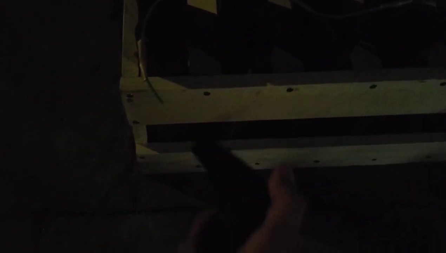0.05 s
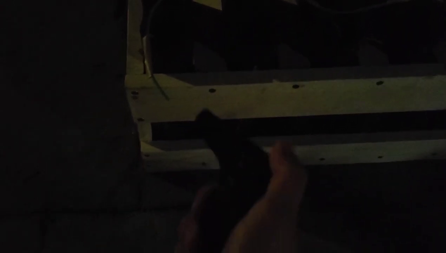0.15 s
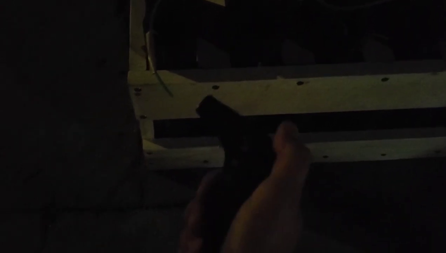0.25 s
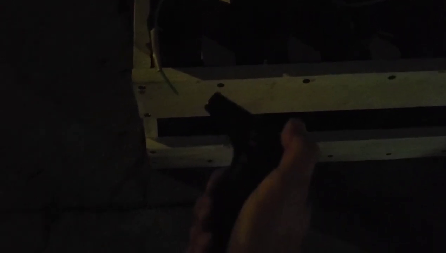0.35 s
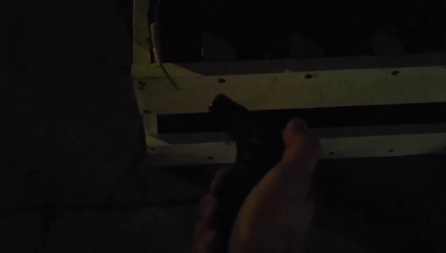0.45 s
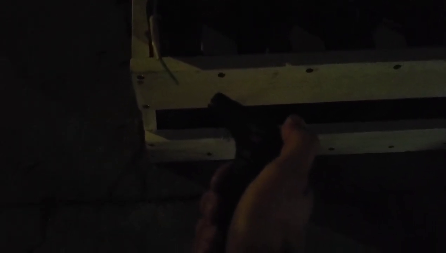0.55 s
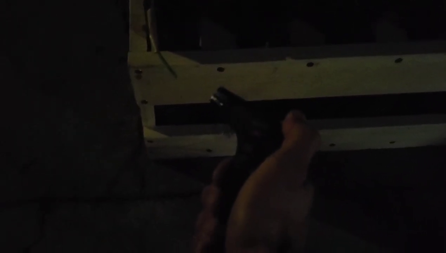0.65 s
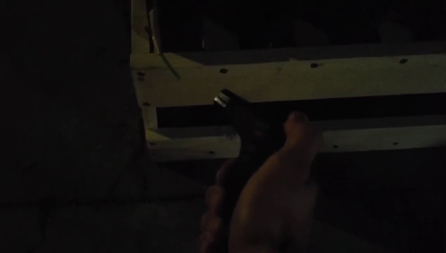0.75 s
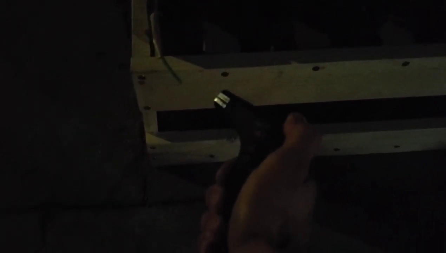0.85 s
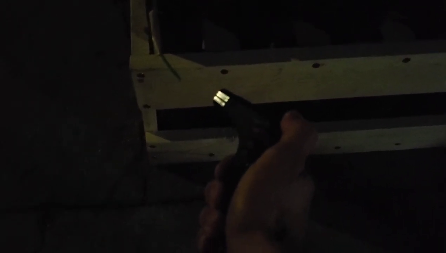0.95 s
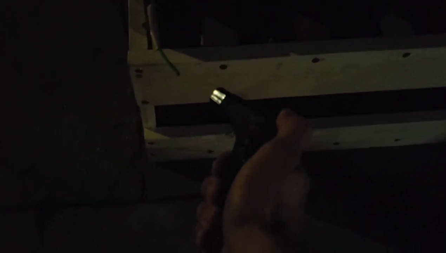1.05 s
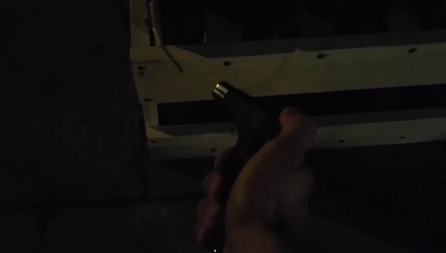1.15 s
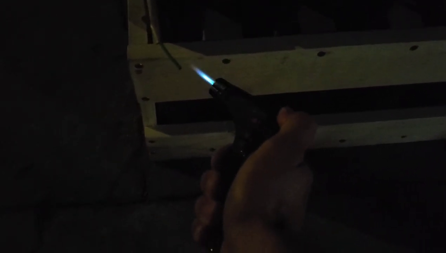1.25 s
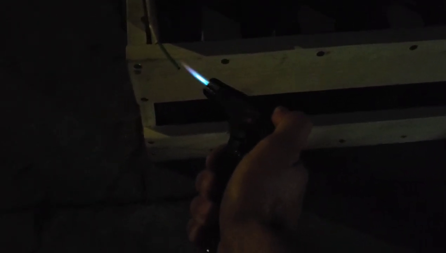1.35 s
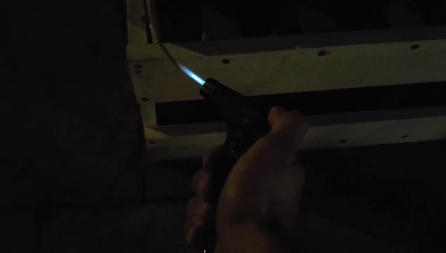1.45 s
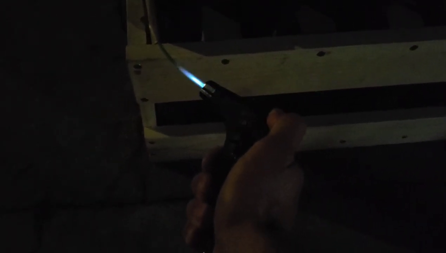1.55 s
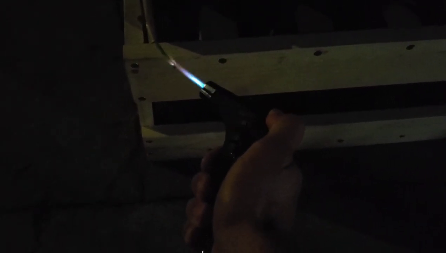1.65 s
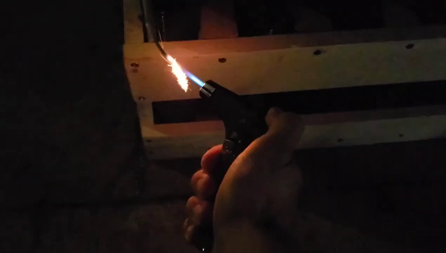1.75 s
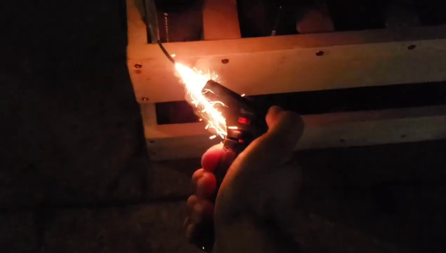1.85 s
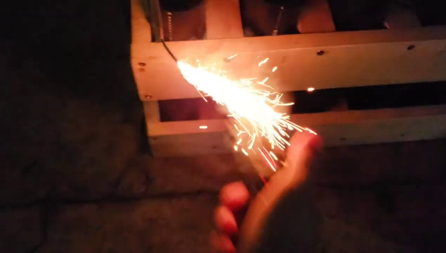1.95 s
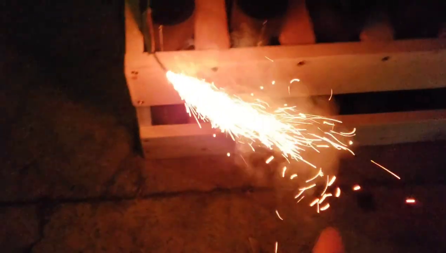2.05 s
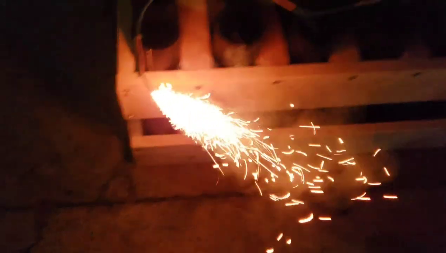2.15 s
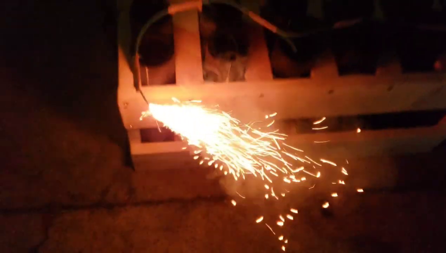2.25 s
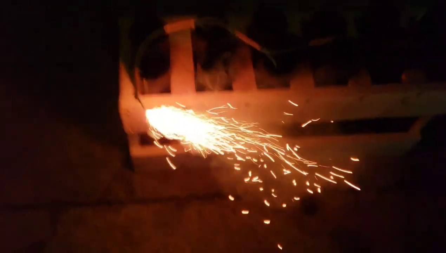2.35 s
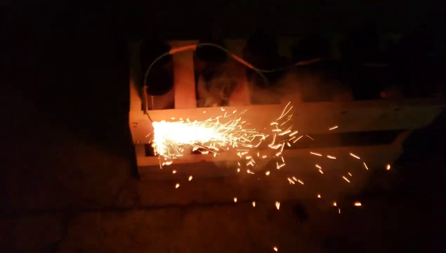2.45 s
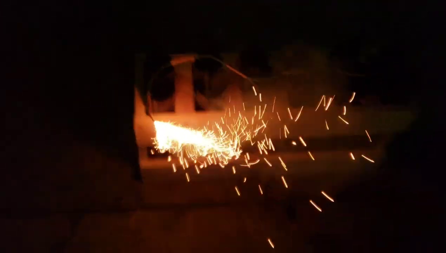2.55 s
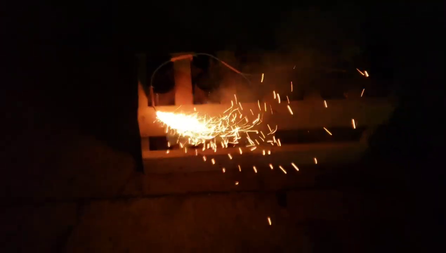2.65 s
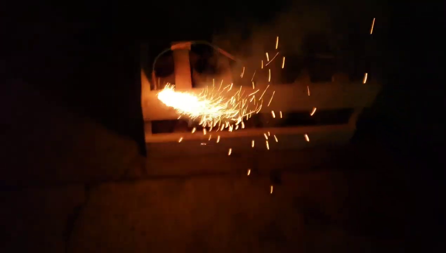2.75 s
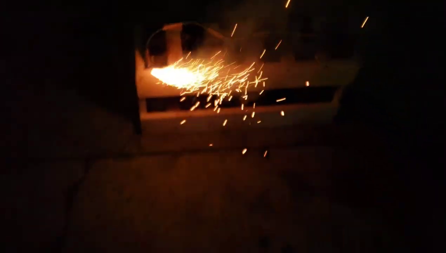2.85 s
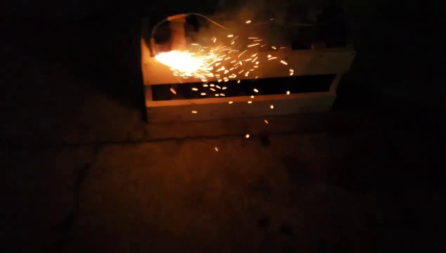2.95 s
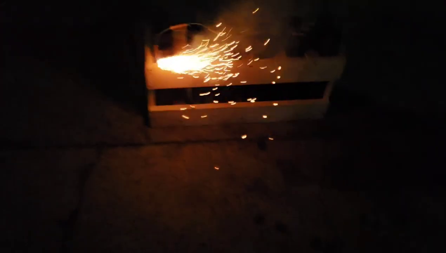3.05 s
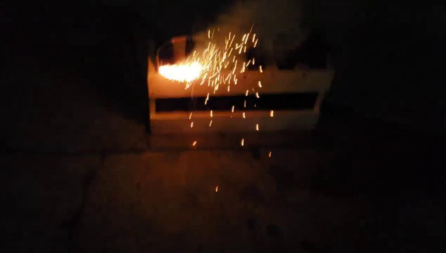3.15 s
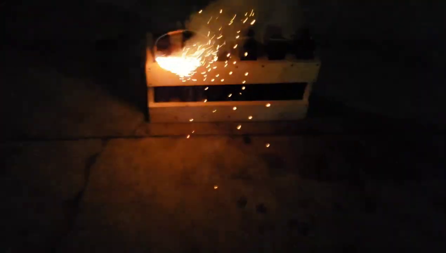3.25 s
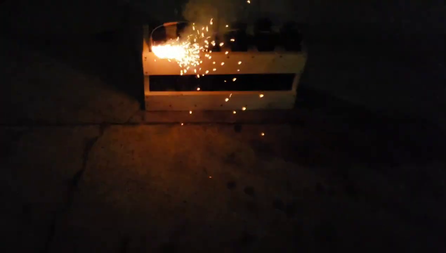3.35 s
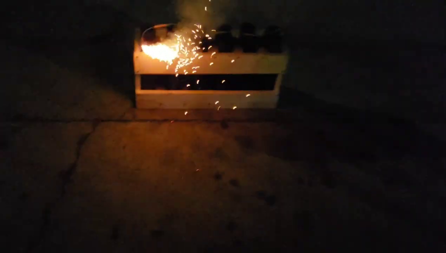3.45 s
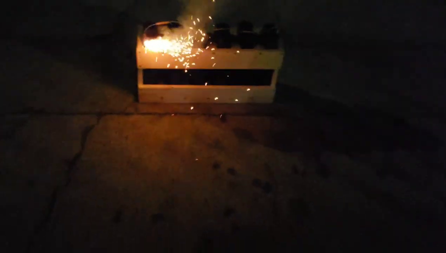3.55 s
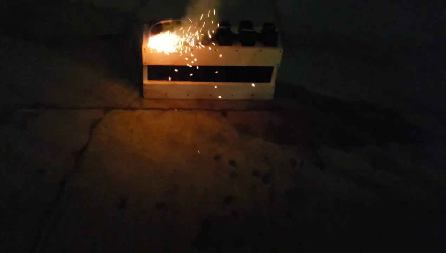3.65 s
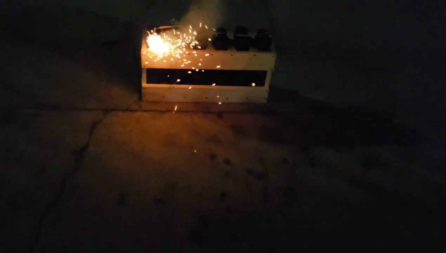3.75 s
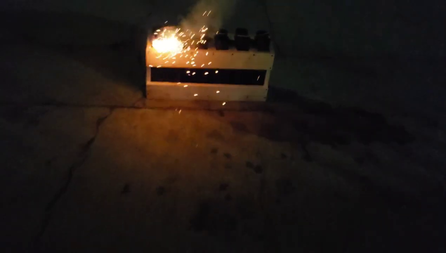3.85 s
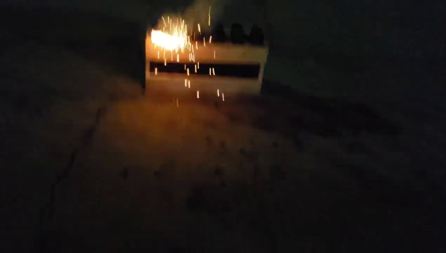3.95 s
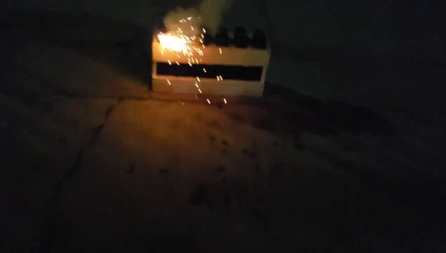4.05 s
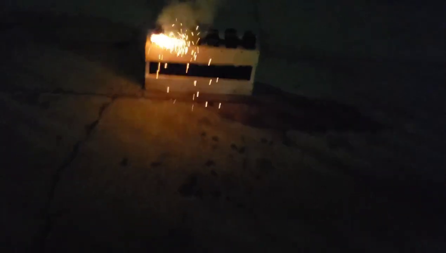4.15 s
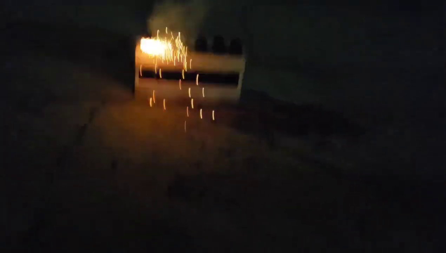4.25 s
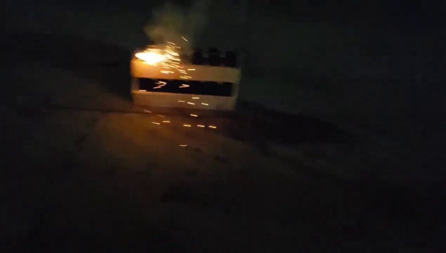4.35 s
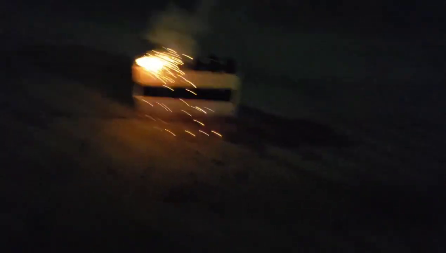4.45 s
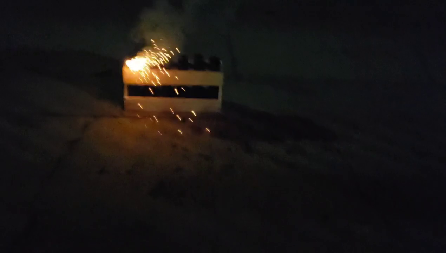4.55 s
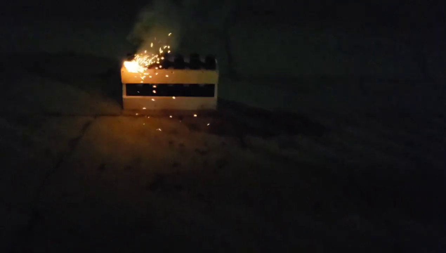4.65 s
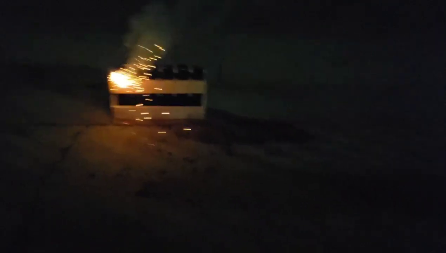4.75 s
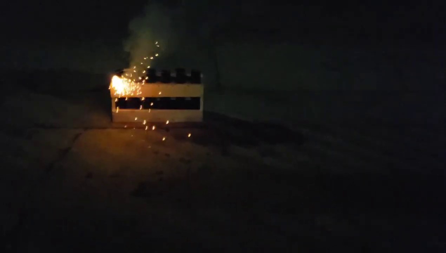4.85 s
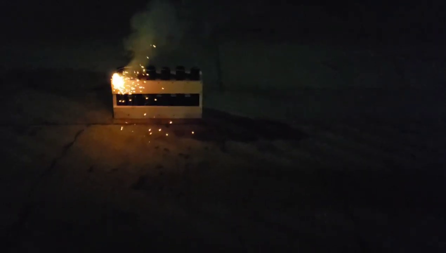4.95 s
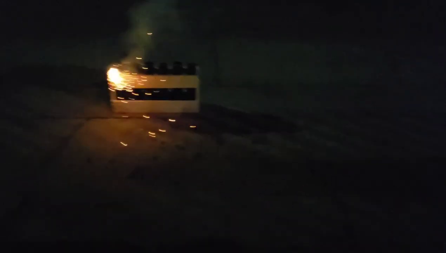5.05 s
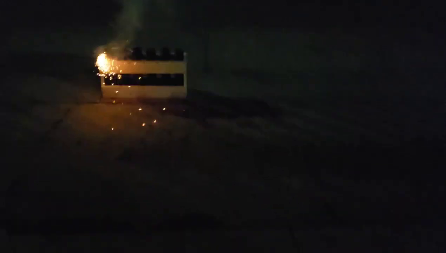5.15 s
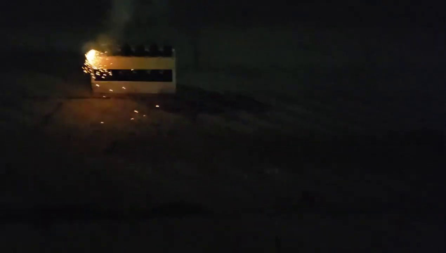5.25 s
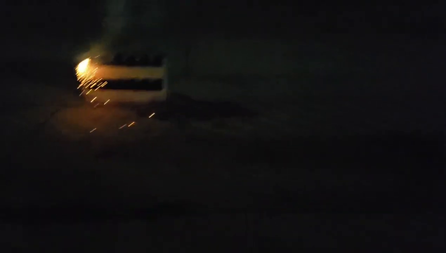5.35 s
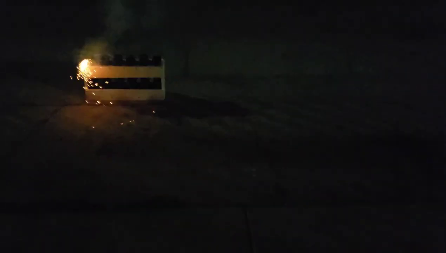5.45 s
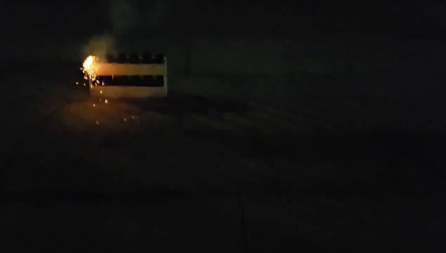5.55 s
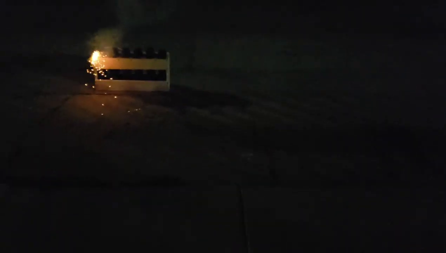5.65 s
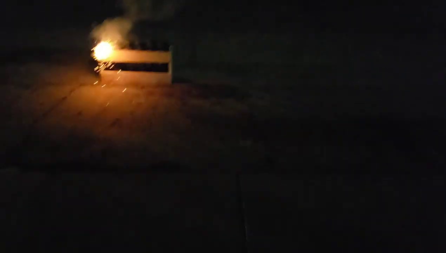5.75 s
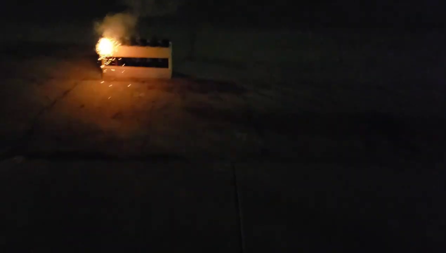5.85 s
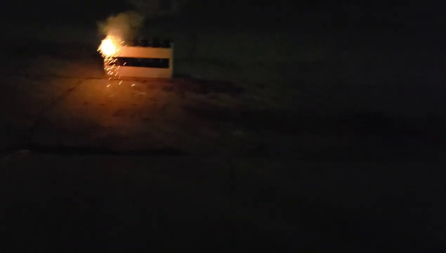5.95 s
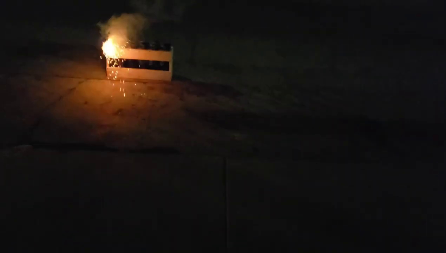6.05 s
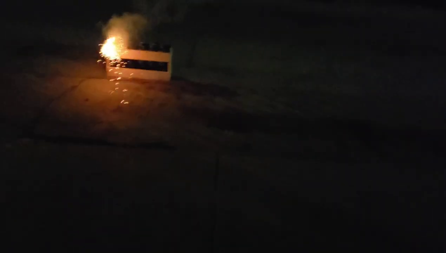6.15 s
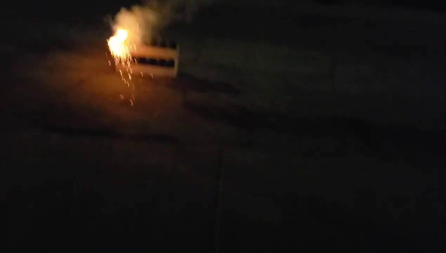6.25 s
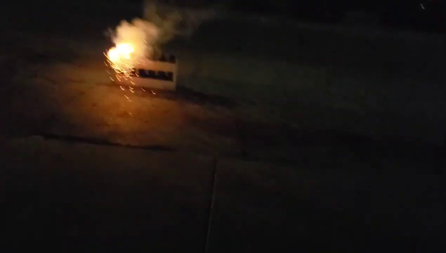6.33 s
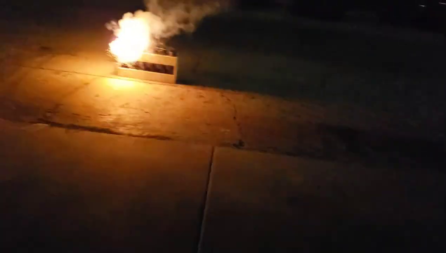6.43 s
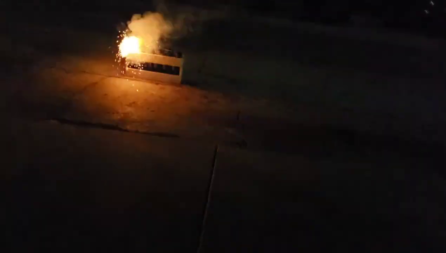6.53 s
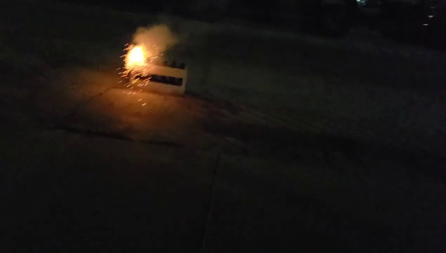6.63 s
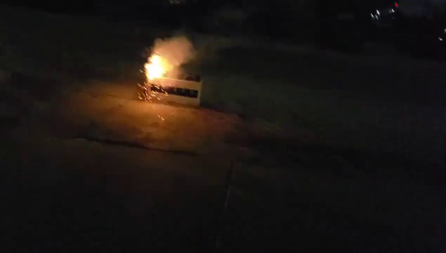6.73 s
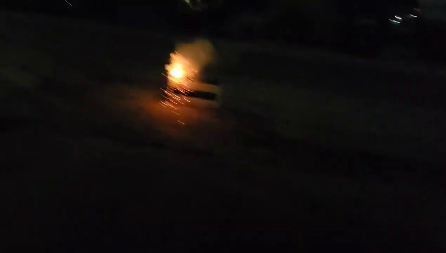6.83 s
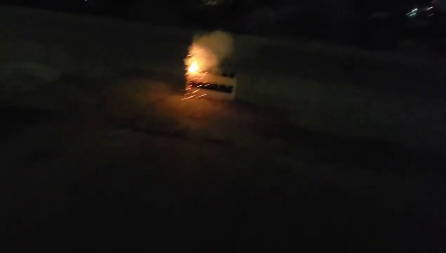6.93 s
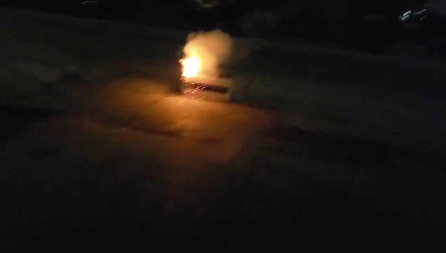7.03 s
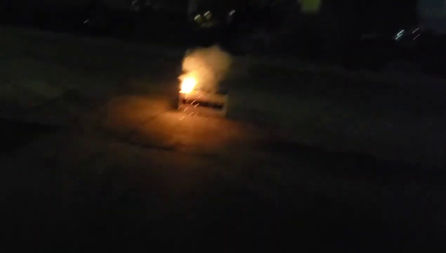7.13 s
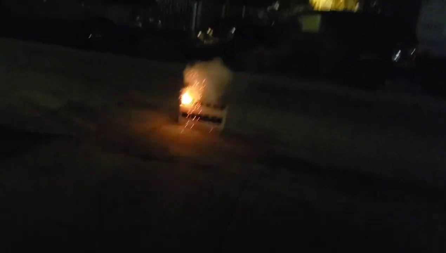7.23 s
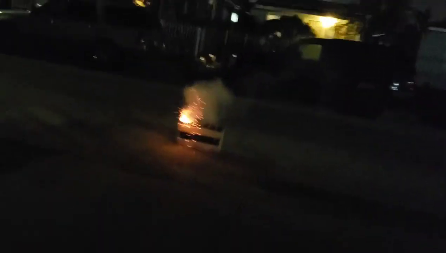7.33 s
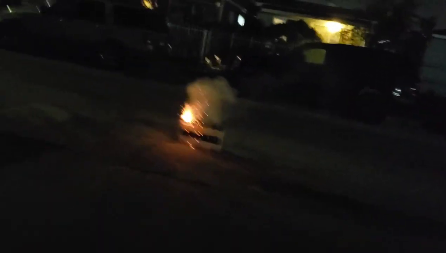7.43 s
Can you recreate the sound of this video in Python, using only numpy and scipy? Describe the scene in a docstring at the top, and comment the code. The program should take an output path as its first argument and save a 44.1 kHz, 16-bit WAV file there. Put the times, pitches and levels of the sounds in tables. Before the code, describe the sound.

Distant traffic makes a low outdoor rumble throughout, with a brief low hum swelling at about 1 second, alongside a faint finger rub. At 1.2 seconds a gas torch's igniter snaps sharply close to the microphone, and the jet burns with a soft hiss. At 1.8 seconds a firework fuse catches and fizzes brightly, sputtering with tiny sparks, strongest around 2.3 to 2.5 seconds. The hiss then eases and shifts in colour as the microphone backs away over concrete. Single sparks crack near 2 and 3.1 seconds. From 2.6 seconds an engine throbs low some way off, growing louder from about 4.6 seconds. From 5.5 seconds the fuse, now among the slats of a wooden crate, surges again with sharp crackles and a hollow rush that rises in pitch. Short spurts and pops cluster from 6.4 seconds until the end at about 7.5 seconds.

```python
"""Outdoors at night. Far traffic rumbles throughout; two low drones swell and fade. A finger brushes a gas
torch, gas hisses, the igniter snaps at 1.2 s and the jet burns. From 1.8 s a fuse on a wooden crate hisses and
spits sparks. The listener backs away: the echo off the concrete follows ever closer, its comb widens. From 2.6
s an engine throbs some way off. From 4.4 s the flame creeps in among the slats, and from 5.7 s a hollow rush
rises around a resonance climbing from 1.2 to 1.65 kHz."""
import sys
import numpy as np
from scipy import signal
from scipy.fft import rfft, irfft, next_fast_len
from scipy.io import wavfile
from scipy.ndimage import uniform_filter1d, map_coordinates

SR = 44100
rng = np.random.default_rng(int(sys.argv[2]) if len(sys.argv) > 2 else 0)


def master_out(mix):
    """Clip the mix to full scale and print it as 16-bit PCM to the path in sys.argv[1]."""
    frames = np.transpose(np.atleast_2d(mix))
    ceiling = np.clip(frames, -1, 1)
    pcm = np.round(ceiling * 32767).astype(np.int16)
    wavfile.write(sys.argv[1], SR, pcm)


N = 330309
TIME_S = np.arange(N) / SR

# far road: time_s, rumble_db, boom_db, wash_db
TRAFFIC_LEVELS = [(0.0, -48, -47, -50), (0.56, -48, -48.5, -42.5), (1.11, -48, -44, -46.5),
                  (1.52, -46, -45.5, -55.5), (2.3, -47.5, -54, -53.5), (2.77, -53, -54, -53),
                  (3.3, -49.5, -49, -52.5), (4.3, -38, -51, -51), (4.55, -53, -53, -52.5),
                  (5.19, -43, -39.5, -45), (5.5, -42, -38.5, -45), (6.05, -54, -38, -48.5),
                  (6.72, -44.5, -37.5, -52.5), (7.49, -41, -41, -51.5)]
# road noise bands: freq_hz, density_db
RUMBLE_SPECTRUM = [(12, -67), (20, -15.5), (30, -41), (42, -9.5), (59, 0.5), (80, -10), (90, -7.5),
                   (120, -26), (200, -120)]
BOOM_SPECTRUM = [(41, -38), (70, 0.5), (86, -9), (119, -1.5), (146, -12.5), (220, -22), (290, -49),
                 (480, -120)]
WASH_SPECTRUM = [(88, -15.5), (150, -9.5), (253, -10), (352, -13.5), (569, -21.5), (680, -16.5),
                 (920, -20.5), (1180, -21.5), (1370, -25.5), (1570, -22), (4000, -56), (5200, -95.5),
                 (8800, -120)]
# microphone hiss: freq_hz, density_db
HISS_SPECTRUM = [(1470, -8.5), (2500, 4), (3180, -17), (4110, -6), (5440, -14.5), (7190, -11), (8330, -29),
                 (9080, -39), (12100, -22), (15200, -16), (16000, -22)]
# far tones: peak_s, pitch_hz, level_db, swell_20db_s, fade_20db_s, sag_hz_per_s
DRONE_TONES = [(0.3, 168.1, -41, .25, 0.23, 10), (1.04, 112, -25.5, 0.11, 0.21, 16)]
# finger on the grip: peak_s, level_db, rise_25db_s, fall_25db_s
FINGER_STROKE = (0.935, -59, .025, .08)
# skin friction: freq_hz, density_db
SKIN_SPECTRUM = [(2350, -51), (4000, -13), (4960, -24), (5310, -9), (5830, -6), (6550, -5), (8210, -29),
                 (9770, -4), (11900, -22), (13800, -10), (16000, -15)]
# gas jet, cold then alight: start_s, end_s, level_db
GAS_FLOWS = [(1.153, 1.196, -59.5), (1.24, 1.9, -50)]
# nozzle noise: freq_hz, density_db
GAS_SPECTRUM = [(410, -45), (700, -4), (1120, -7.5), (1210, -4.5), (1620, -2.5), (1800, -8), (2080, -5.5),
                (2330, -4), (2560, -11), (5330, -18), (8310, -25.5), (13300, -15), (16000, -8)]
# trigger and rebound: start_s, level_db, t60_s
IGNITER_SNAPS = [(1.2074, -14, 0.0096), (1.2307, -33, 0.0041)]
# torch body: freq_hz, level_db, t60_s
SHELL_MODES = [(5570, -6.5, 0.017), (6620, -3.5, 0.013), (7400, -7, 0.015), (9550, 1, .007),
               (11800, -13, 0.0086), (14860, 1, .008)]
# slow burn: time_s, fizz_db, roar_re_fizz_db, top_re_fizz_db
FUSE_LEVELS = [(1.76, -70, -6, 12), (1.785, -55, 2, 10.5), (1.86, -51.5, -2, 10.5),
               (1.95, -44.5, -2.5, 16.5), (2.3, -40.5, -5.5, 7), (2.54, -46.5, -2.5, 9.5),
               (3.42, -52, -2, 13.5), (3.74, -46.5, -5.5, 5.5), (3.95, -51.5, -1.5, 12.5),
               (4.43, -49.5, -2, 10), (4.56, -52, -3, 10), (5.05, -49.5, -3.5, 10.5),
               (5.4, -52.5, -9.5, 13), (5.66, -51, -7, 9), (5.8, -45, -8.5, 11), (6.0, -41.5, -9.5, 2.5),
               (6.38, -43.5, -7.5, 7.5), (6.62, -51.5, -7.5, 7), (6.8, -47, -5.5, 7), (6.96, -55.5, 0, 9),
               (7.28, -56.5, 0.5, 7), (7.49, -55, 4.5, 8.5)]
# fuse bands, in the open and among the slats: freq_hz, density_db
ROAR_OPEN = [(200, -31), (350, -13), (600, 1.5), (900, 1), (1300, -0.5), (2600, -1.5), (4000, -20),
             (5200, -65), (8800, -120)]
FIZZ_OPEN = [(1470, -46), (2500, -8.5), (2660, -14), (2940, -3), (3680, 0.5), (4490, -1.5), (5400, -0.5),
             (6990, 3.5), (8260, -7), (9500, -9.5), (12400, -14.5), (20900, -120)]
TOP_OPEN = [(5000, -28.5), (8500, -19), (14800, 0), (15400, 2.5), (16000, -3.5)]
ROAR_HIDDEN = [(290, -32), (500, 3), (800, -1.5), (1500, 2), (2300, 3), (3000, -1), (4000, -22),
               (5200, -43), (8800, -120)]
FIZZ_HIDDEN = [(1470, -48), (2500, -21), (3310, -5.5), (4670, 3), (5280, -0.5), (6720, 5), (8310, -6),
               (9500, -19), (12400, -5), (20900, -120)]
TOP_HIDDEN = [(5000, -24.5), (8500, -14), (9750, -6), (10600, 2), (11200, 0.5), (15100, -0.5), (16000, -5)]
# flame among the slats: time_s, hidden_share
FLAME_HIDING = [(4.4, 0.11), (5.3, 1)]
# spurts clear of the slats: peak_s, fizz_boost_db, top_boost_db, rise_s, fall_s
FUSE_SPURTS = [(2.489, 8.4, 0.5, 0.023, 0.065), (3.77, 3.46, -2, 0.032, 0.06),
               (5.01, 1.48, -1.5, .07, 0.097), (5.31, 8, -4.5, .02, 0.04), (5.66, 4, -2, 0.019, 0.016),
               (5.87, 1.45, 0, .03, .05), (6.4, 5.2, 4.5, .02, 0.14), (6.67, 1.85, 7.5, 0.02, 0.11),
               (6.88, 1.1, 5, 0.031, 0.027), (6.94, 10.7, 6, .01, 0.022), (7.03, 11.3, 2.5, 0.079, 0.044),
               (7.32, 9, 5, 0.025, 0.023), (7.355, 13.9, 8, 0.035, 0.043)]
# loud sparks: start_s, high_band_db, low_band_db, left_re_right_db
LOUD_SPARKS = [(1.951, -26, -20, 8), (3.1194, -23, -29, -1), (5.538, -22, -40, 13),
               (5.6531, -36, -21.5, 15), (5.6662, -15.5, -31, 15), (5.802, -24, -21, 12),
               (6.397, -16.5, -31, 11), (6.9374, -26.5, -38, 7), (6.9432, -15, -18, 17),
               (7.311, -32, -22, 3), (7.334, -31, -21, -3), (7.351, -23, -22, -5)]
# engine orders 3-5: time_s, cycle_hz, third_db, fourth_db, fifth_db
ENGINE_RUN = [(2.6, 25.4, -49, -61, -54.5), (3.05, 26.52, -44, -49, -47), (3.22, 26.78, -35.5, -55, -49.5),
              (3.52, 26.2, -39, -53, -50), (3.7, 26.22, -51.5, -47, -54), (4.15, 26.2, -31.5, -59, -45.5),
              (4.34, 26.32, -40.5, -63, -54), (4.61, 25.5, -31.5, -41, -36.5), (4.89, 25.95, -26, -32, -38),
              (5.21, 27.22, -33.5, -30, -27.5), (5.57, 28.34, -28.5, -45, -40),
              (5.83, 28.55, -23.5, -30, -30.5), (6.14, 28.9, -24.5, -30, -43), (6.47, 28.9, -24, -50, -49),
              (6.65, 28.27, -30, -39, -37), (6.75, 28.2, -24, -36, -48), (7.09, 25.7, -36.5, -39.5, -39.5),
              (7.26, 26.37, -29, -44, -38.5), (7.45, 26.8, -26.5, -34, -50), (7.49, 27, -33, -31, -59)]
# other engine orders: order, level_re_third_db
ENGINE_ORDERS = [(2, -17), (6, -23.5), (7, -32.5), (8, -30.5), (9, -31), (10, -42), (11, -32), (12, -39)]
# hollow rush: time_s, centre_hz, level_re_fizz_db
HOLLOW_RESONANCE = [(5.68, 1158, -23), (5.76, 1177, -12), (6.38, 1300, -14), (6.5, 1559, -14.5),
                    (6.87, 1607, -7.5), (6.95, 1630, -9), (7.03, 1662, 7), (7.08, 1650, -6),
                    (7.25, 1640, 1), (7.49, 1660, -13)]
# echo off the next slat: time_s, level_db
SLAT_ECHO = [(1.2, -23), (4.5, -45), (5.6, -23), (5.8, -15.5), (6.4, -28), (6.7, -22), (7.49, -10)]
# walk backwards: time_s, distance_m
WALK_PATH = [(1.35, 1.01), (1.8, 1.09), (2.4, 1.09), (3, 1.354), (3.15, 1.566), (3.75, 2.03), (4.05, 2.36),
             (4.95, 2.9), (5.1, 3.08), (5.8, 3.55), (6.2, 3.72), (6.6, 4.38), (7, 4.92), (7.49, 5)]
# echo off the concrete: time_s, level_db, treble_share
GROUND_ECHO = [(1.8, -6, .7), (2.4, -5, .7), (2.9, -5, .4), (4.65, -7, .75), (5.4, -11, .7), (5.8, -5, .3),
               (6.2, -5, .05), (7, -2.5, .12)]
# microphone port imbalance: freq_hz, left_re_right_db
PORT_BALANCE = [(60, 0.5), (92, 1.5), (140, 1), (210, 0.5), (330, 2.5), (500, 0.5), (770, 2.5), (1170, 4),
                (1790, 9.5), (2740, 8), (4190, 5.5), (6410, 11.5), (9810, 12.5), (15000, 5)]
# microphone turning from the flame: time_s, left_lead_ms
MIC_AIM = [(2.9, -0.011), (3.3, -0.024), (3.7, -0.0064), (4.6, -0.0066), (5.2, 0.014), (6.4, 0.0084),
           (6.8, -0.043), (7.1, -0.073)]
# housing phase shift, sound from ahead: freq_hz, left_lead_rad
HOUSING_PHASE = [(0, -10), (340, -0.5), (1640, 1.33), (2500, 1.15), (3100, 2), (3700, 1.5), (4220, 1.73),
                 (4480, 5), (5000, 3.5), (6800, 4), (7490, 6.5), (7750, 8.5), (9220, 7.5), (16500, 5)]

HISS_DB, BAND_LIMIT_HZ = -68, 15950
VALVE_FADE_S, SLAT_DELAY_MS = 0.068, 0.431
FLAME_HEIGHT_M, MIC_HEIGHT_M, SOUND_M_PER_MS = .45, 1.2, .343
SNAP_SHADED_SHARE = .5  # kept from the ground by the hand


def amp(db):
    return 10 ** (np.asarray(db) / 20)


def unit_rms(x):
    return x / np.sqrt(np.mean(x ** 2) + 1e-20)


def log_interp(points, hz):
    """(freq_hz, value) points read on a log axis."""
    knots_hz, values = np.transpose(points)
    return np.interp(np.log(hz + 1), np.log(knots_hz + 1), values)


def curves(rows):
    """One per-sample curve for each column after time_s."""
    time_s, *columns = np.transpose(rows)
    return [np.interp(TIME_S, time_s, column) for column in columns]


def gate(rows, fade_s):
    """1 from first row to last, fading to 0 outside."""
    start_s, end_s = rows[0][0], rows[-1][0]
    return np.interp(TIME_S, [start_s - fade_s, start_s, end_s, end_s + fade_s], [0, 1, 1, 0])


def wobble(rate_hz):
    """Smooth random curve."""
    return map_coordinates(rng.standard_normal(int(N * rate_hz / SR) + 4), [TIME_S * rate_hz])


def filtered(x, response):
    """x through a complex response(hz)."""
    size = next_fast_len(N + 8192)
    return irfft(rfft(x, size) * response(np.fft.rfftfreq(size, 1 / SR)), size)[..., :N]


def coloured(x, spectrum):
    """x shaped by a spectrum, rms 1."""
    return unit_rms(filtered(x, lambda hz: amp(log_interp(spectrum, hz))))


def delayed(x, delay_ms):
    return map_coordinates(x, [np.arange(N) - delay_ms * SR / 1000], order=5)


def patchy(x, depth_db):
    """x with drifting louder and softer spectral patches."""
    bins = signal.stft(x, nperseg=256)[2]
    field = uniform_filter1d(uniform_filter1d(rng.standard_normal(bins.shape), 5, 0), 25, 1)
    return signal.istft(bins * amp(depth_db * unit_rms(field)), nperseg=256)[1][:N]


def at_ports(x, left_lead_ms, scatter):
    """x at two microphone ports; scatter (freq_hz, share) arrives in random phase."""
    pair = np.array([delayed(x, -left_lead_ms / 2), delayed(x, left_lead_ms / 2)])
    bin_hz, _, bins = signal.stft(pair, SR, nperseg=128)
    share = np.clip(log_interp(scatter, bin_hz), 0, 1)[:, None]
    phasors = np.exp(2j * np.pi * rng.random(bins.shape))
    bins *= np.sqrt(1 - share) + 0.68 * np.sqrt(share) * phasors
    pair = signal.istft(bins, SR, nperseg=128)[1][:, :N]
    return filtered(pair, lambda hz: amp(np.outer([.5, -.5], log_interp(PORT_BALANCE, hz))))


def traffic():
    """Far road noise: returns (rumble plus boom, wash)."""
    rumble_db, boom_db, wash_db = curves(TRAFFIC_LEVELS)
    noise = rng.standard_normal((3, N))
    rumble = amp(rumble_db) * coloured(noise[0], RUMBLE_SPECTRUM)
    boom = amp(boom_db) * coloured(noise[1], BOOM_SPECTRUM)
    wash = amp(wash_db + 1.23 * wobble(7.6)) * coloured(noise[2], WASH_SPECTRUM)
    return rumble + boom, wash


def air_buffet():
    """Air on each port separately; level follows the rumble."""
    rumble_db = curves(TRAFFIC_LEVELS)[0]
    spectrum = [(18, -50), (30, -30), (46, -5), (60, -3), (90, -57.5)]
    return amp(rumble_db - 11) * coloured(rng.standard_normal((2, N)), spectrum)


def mic_hiss():
    """Steady self-noise, stereo."""
    hiss = amp(HISS_DB) * coloured(rng.standard_normal(N), HISS_SPECTRUM)
    return at_ports(hiss, -0.00099, scatter=[(4000, 0.78), (14000, 0.032)])


def drones():
    """Far low tones swell, fade and sag in pitch."""
    out = np.zeros(N)
    for peak_s, hz, db, swell_s, fade_s, sag_hz_per_s in DRONE_TONES:
        t = TIME_S - peak_s
        level_db = db - 20 * np.maximum(-t / swell_s, t / fade_s) ** 2
        out += amp(level_db) * np.sin(2 * np.pi * (hz - sag_hz_per_s * t / 2) * t)
    return out


def finger_rub():
    """Skin slides on the torch grip."""
    peak_s, db, rise_s, fall_s = FINGER_STROKE
    level_db = db - 25 * np.maximum((peak_s - TIME_S) / rise_s, (TIME_S - peak_s) / fall_s)
    return amp(level_db) * coloured(rng.standard_normal(N), SKIN_SPECTRUM)


def gas_jet():
    """Gas hisses from the nozzle, louder once alight."""
    gas = coloured(rng.standard_normal(N), GAS_SPECTRUM) * amp(0.98 * wobble(40.67))
    flow = sum(amp(db) * gate([(start_s,), (end_s,)], VALVE_FADE_S) ** 2
               for start_s, end_s, db in GAS_FLOWS)
    return gas * flow


def igniter():
    """Each snap: crack, shell ring, one push of the striker, thud through the hand."""
    out, t = np.zeros(N), np.arange(SR // 8) / SR
    for start_s, db, t60_s in IGNITER_SNAPS:
        ring = sum(amp(mode_db - 60 * t / mode_t60_s) * np.sin(2 * np.pi * hz * t)
                   for hz, mode_db, mode_t60_s in SHELL_MODES)
        noise = rng.standard_normal(len(t) + 1)
        decay = amp(-60 * t / t60_s) + amp(-21.5 - 60 * t / 0.14)
        crack = (np.diff(noise) + 0.17 * noise[1:]) * decay
        push = t / 0.00029 * np.exp(1 - t / 0.00018)
        thud = amp(-60 * t / 0.093) * np.sin(2 * np.pi * 62 * t)
        snap = amp(-4) * crack + amp(-6.5) * ring + amp(-26) * push - amp(-13) * thud
        out[round(start_s * SR):][:len(t)] += amp(db) * snap
    return out


def fuse():
    """The powder jet sputters, spurts and crackles; the slats recolour it."""
    fizz_db, roar_db, top_db = curves(FUSE_LEVELS)
    spurt_db, flare_db = sum(
        np.outer(boosts_db, np.interp(TIME_S, [peak_s - rise_s, peak_s, peak_s + fall_s], [0, 1, 0]))
        for peak_s, *boosts_db, rise_s, fall_s in FUSE_SPURTS)
    hidden, = curves(FLAME_HIDING)
    sputter_db = 0.53 * wobble(18) + 0.6 * wobble(70) + 0.15 * wobble(300)
    onsets = rng.random(N) < 150 / SR  # 150 small sparks per s
    crackle = onsets * amp(np.minimum(4.8 * rng.exponential(size=N), 24)) * rng.choice([-1, 1], N)
    jet = rng.standard_normal(N) + 0.03 * unit_rms(crackle)

    def band(open_spectrum, hidden_spectrum):
        return (1 - hidden) * coloured(jet, open_spectrum) + hidden * coloured(jet, hidden_spectrum)

    fizz = band(FIZZ_OPEN, FIZZ_HIDDEN) + (amp(spurt_db) - 1) * coloured(jet, FIZZ_OPEN)
    top = amp(top_db + flare_db + 1.03 * wobble(25)) * band(TOP_OPEN, TOP_HIDDEN)
    roar = amp(roar_db + 0.44 * sputter_db) * band(ROAR_OPEN, ROAR_HIDDEN)
    burn = amp(sputter_db - 1.76) * (fizz + top) + roar + hollow_rush(half_width_hz=170)
    return gate(FUSE_LEVELS, fade_s=.03) * amp(fizz_db) * burn


def loud_sparks():
    """Each spark: a sharp pressure pulse with a wisp of fizz, panned."""
    out, t = np.zeros((2, N + SR)), np.arange(SR // 50) / SR
    high = signal.butter(2, 4000, "high", fs=SR, output="sos")
    low = signal.butter(2, [800, 4000], "band", fs=SR, output="sos")
    for start_s, high_db, low_db, pan_db in LOUD_SPARKS:
        burst = (t == 0) + 0.37 * rng.standard_normal(len(t)) * amp(-60 * t / 0.006)
        spark = amp(high_db) * signal.sosfilt(high, burst) + amp(low_db) * signal.sosfilt(low, burst)
        out[:, round(start_s * SR):][:, :len(t)] += amp([[pan_db / 2], [-pan_db / 2]]) * spark
    return out[:, :N]


def engine():
    """Uneven firing leaves low orders of the cycle; orders 3-5 flutter least."""
    cycle_hz, *levels_db = curves(ENGINE_RUN)
    cycle_rad = 2 * np.pi * np.cumsum(cycle_hz) / SR

    def tone(order, db, flutter):
        gain = amp(db + flutter * wobble(7.2))
        return gain * np.sin(order * cycle_rad + flutter * wobble(9) + rng.uniform(0, 5.87))

    main = sum(tone(order, db, flutter=.15) for order, db in zip((3, 4, 5), levels_db))
    others = sum(tone(order, levels_db[0] + db, flutter=.19) for order, db in ENGINE_ORDERS)
    return gate(ENGINE_RUN, fade_s=.1) * (main + others)


def hollow_rush(half_width_hz):
    """A hollow rush: noise around a moving resonance."""
    centre_hz, db = curves(HOLLOW_RESONANCE)
    slow = filtered(rng.standard_normal((2, N)), lambda hz: 1 / (1 + (hz / half_width_hz) ** 2))
    phase_rad = 2 * np.pi * np.cumsum(centre_hz) / SR
    rush = unit_rms(slow[0] * np.cos(phase_rad) + slow[1] * np.sin(phase_rad))
    return gate(HOLLOW_RESONANCE, fade_s=.02) * amp(db) * rush


def from_crate(x):
    """Path to the ports: slat echo, turning microphone, housing phase shift."""
    x = x + amp(curves(SLAT_ECHO)[0]) * delayed(x, SLAT_DELAY_MS)
    pair = at_ports(x, curves(MIC_AIM)[0], scatter=[(500, .44), (2000, .34), (6000, .12), (15000, .55)])
    knots_hz, lead_rad = np.transpose(HOUSING_PHASE)
    return filtered(pair, lambda hz: np.exp(1j * np.outer([.5, -.5], np.interp(hz, knots_hz, lead_rad))))


def with_ground_echo(pair):
    """Adds the concrete's echo; hand shake moves its lag, the rough surface scatters its treble."""
    distance_m, = curves(WALK_PATH)
    echo_db, treble_share = curves(GROUND_ECHO)
    direct_m = np.hypot(distance_m, MIC_HEIGHT_M - FLAME_HEIGHT_M)
    bounce_m = np.hypot(distance_m, MIC_HEIGHT_M + FLAME_HEIGHT_M)
    lag_ms = (bounce_m - direct_m) / SOUND_M_PER_MS + .007 * wobble(9)
    echo = np.array([delayed(port, lag_ms) for port in pair])
    dull = filtered(echo, lambda hz: 1 / (1 + (hz / 3000) ** 3))
    treble = np.array([patchy(port, depth_db=3) for port in echo - dull])
    return pair + amp(echo_db) * (amp(1) * dull + 1.05 * treble_share * treble)


def scene():
    """Torch and fuse ahead, over the concrete; far sources to the right."""
    flame = from_crate(patchy(fuse(), depth_db=1.55) + gas_jet() + finger_rub())
    snap = at_ports(igniter(), left_lead_ms=0.019, scatter=[(100, .001), (5000, 0.021)])
    hiss = mic_hiss()
    near = with_ground_echo(flame + (1 - SNAP_SHADED_SHARE) * snap + loud_sparks())
    near += SNAP_SHADED_SHARE * snap
    road_low, wash = traffic()
    far = at_ports(road_low + drones() + engine(), left_lead_ms=-0.45, scatter=[(60, .004), (300, .0099)])
    far += at_ports(wash, left_lead_ms=-0.36, scatter=[(200, 0.075), (1000, 0.47), (4000, 0.79)])
    return near + far + air_buffet() + hiss


def record(dry):
    """Brick-wall low-pass at the band limit."""
    return filtered(dry, lambda hz: hz < BAND_LIMIT_HZ)


dry = scene()
out = record(dry)
master_out(out)
```